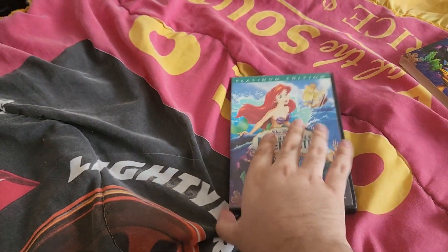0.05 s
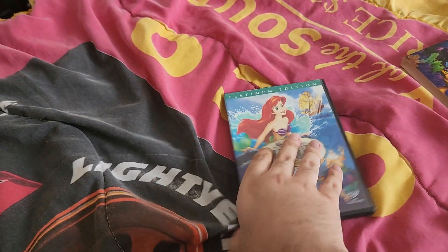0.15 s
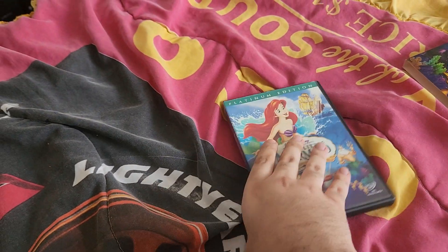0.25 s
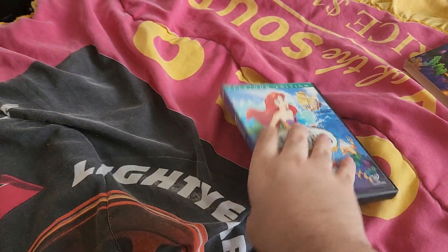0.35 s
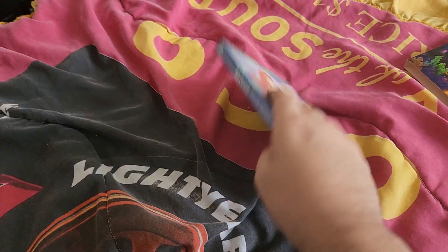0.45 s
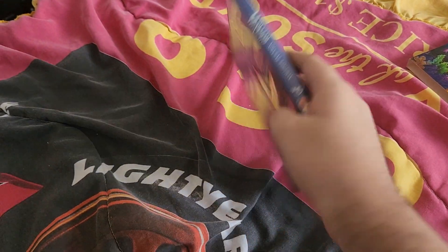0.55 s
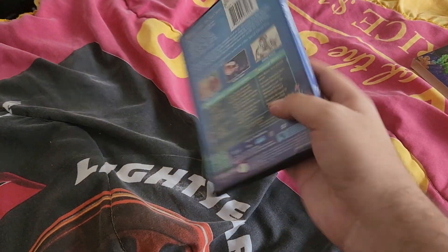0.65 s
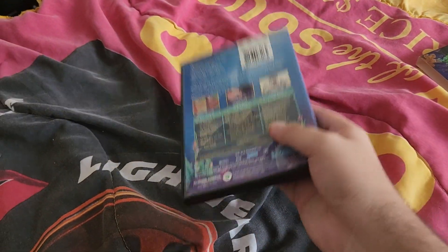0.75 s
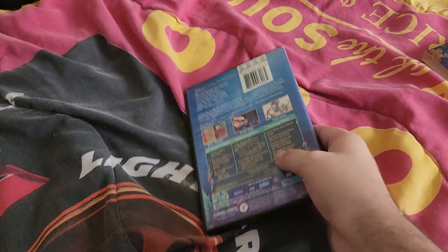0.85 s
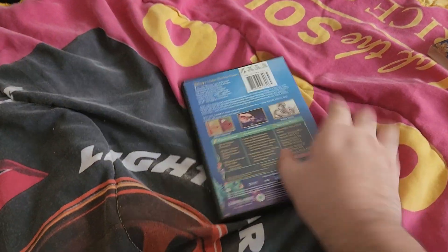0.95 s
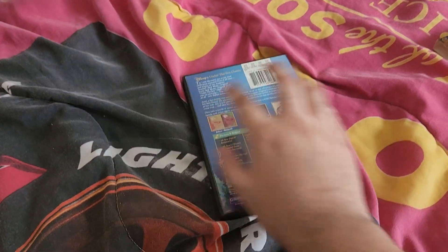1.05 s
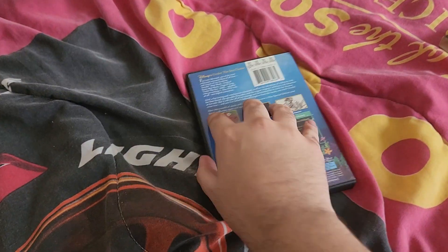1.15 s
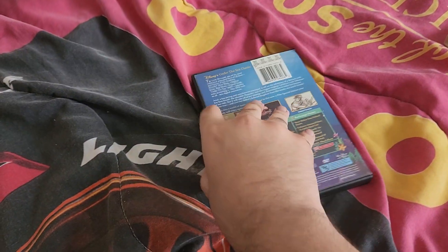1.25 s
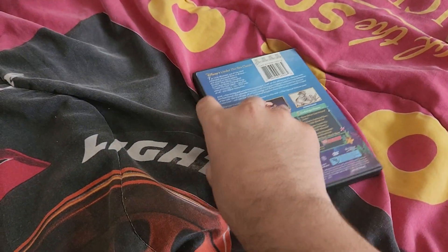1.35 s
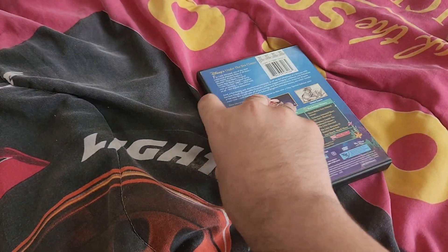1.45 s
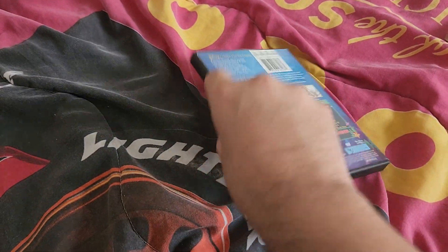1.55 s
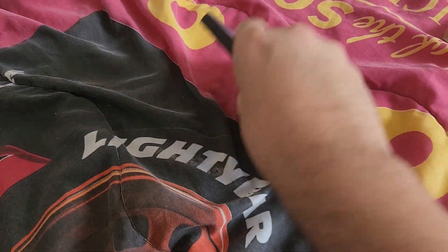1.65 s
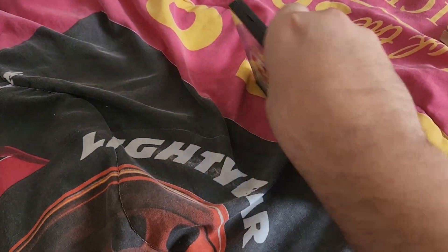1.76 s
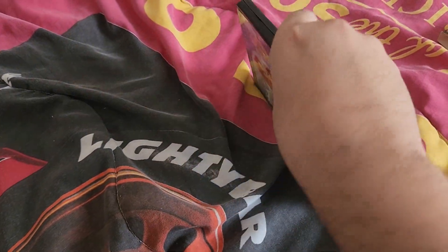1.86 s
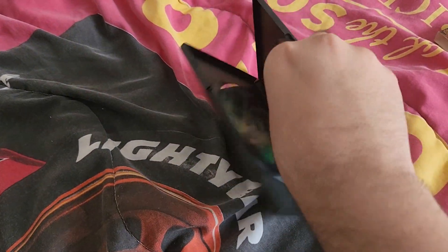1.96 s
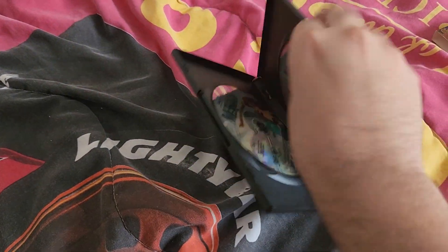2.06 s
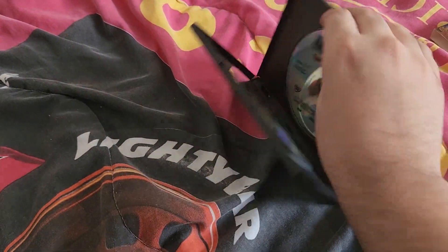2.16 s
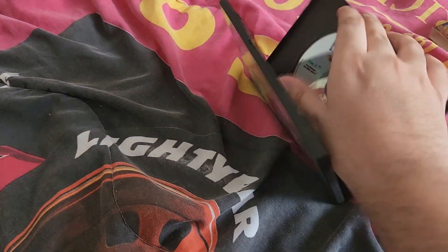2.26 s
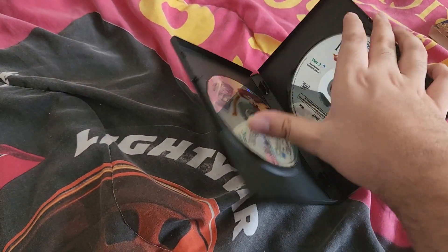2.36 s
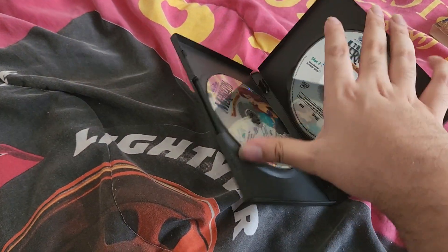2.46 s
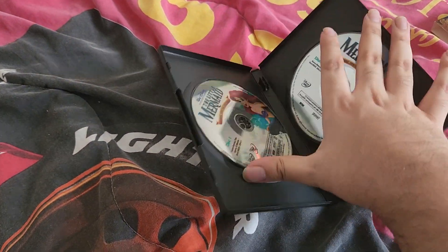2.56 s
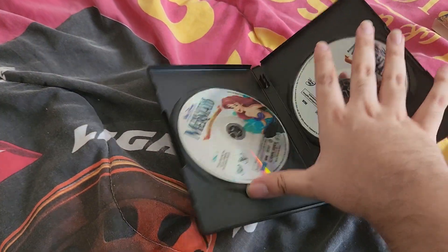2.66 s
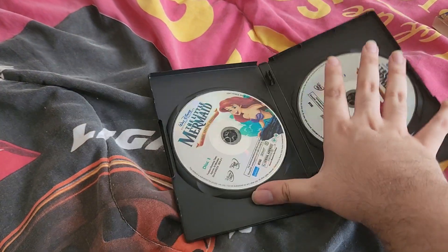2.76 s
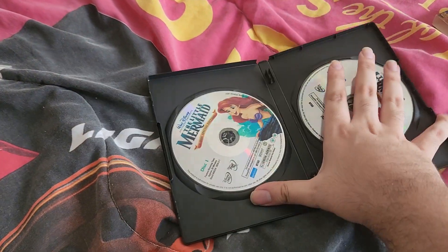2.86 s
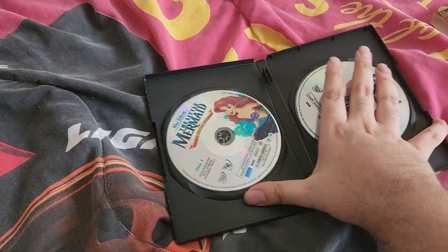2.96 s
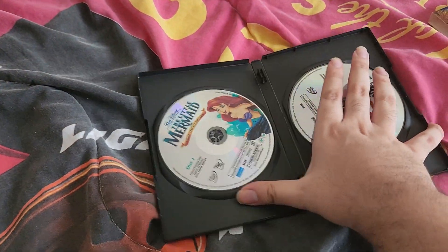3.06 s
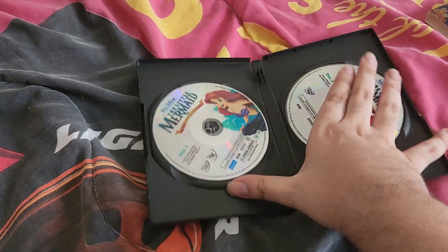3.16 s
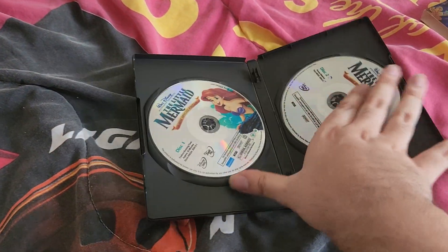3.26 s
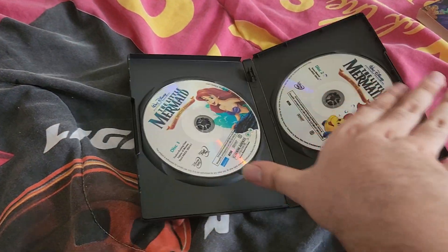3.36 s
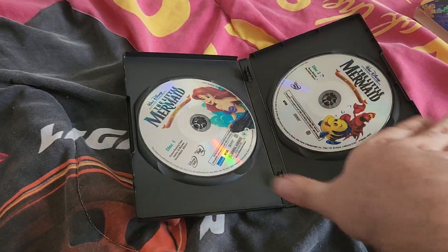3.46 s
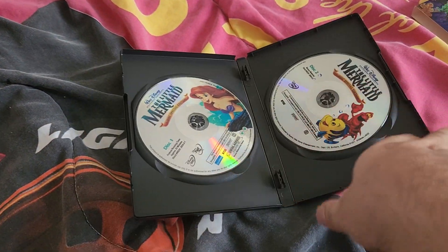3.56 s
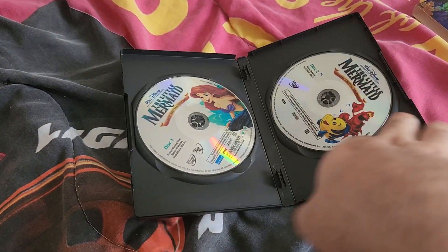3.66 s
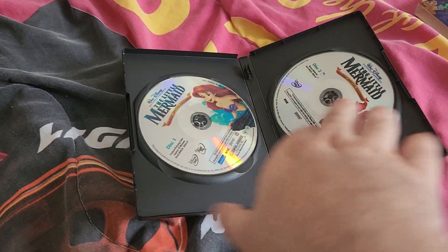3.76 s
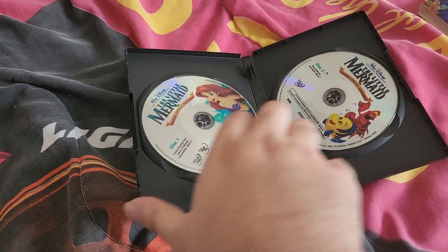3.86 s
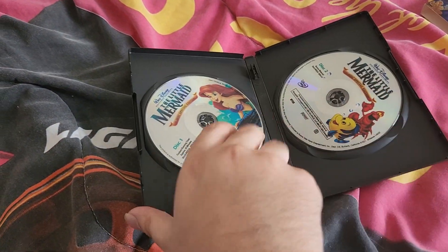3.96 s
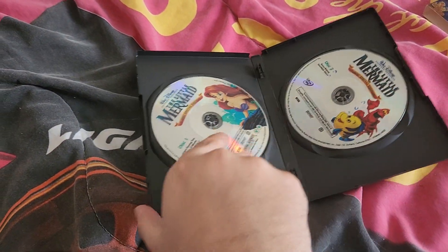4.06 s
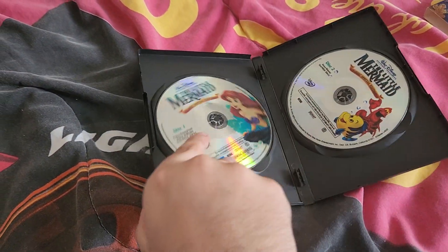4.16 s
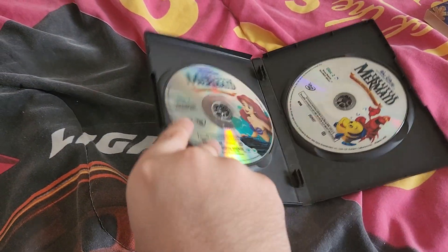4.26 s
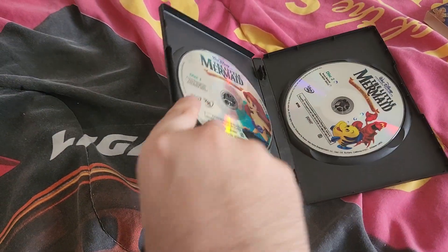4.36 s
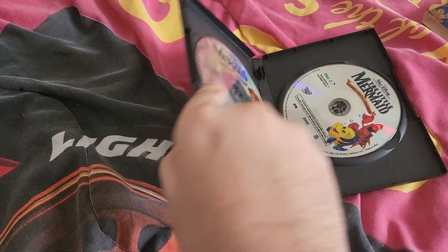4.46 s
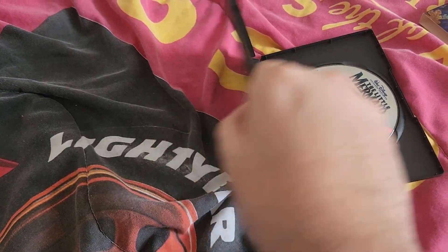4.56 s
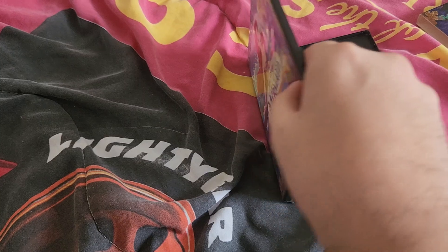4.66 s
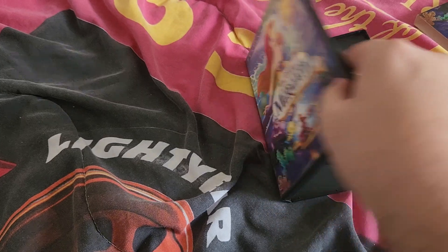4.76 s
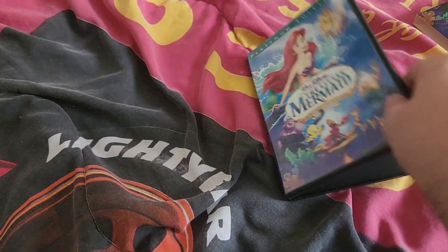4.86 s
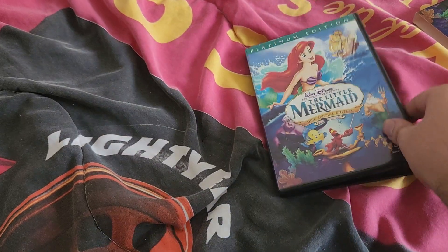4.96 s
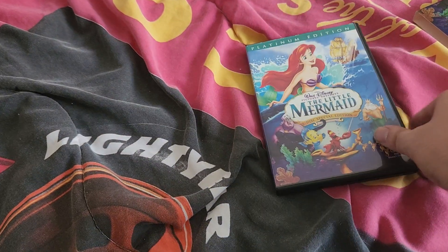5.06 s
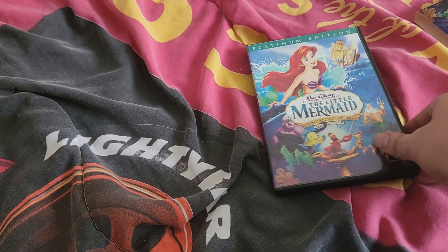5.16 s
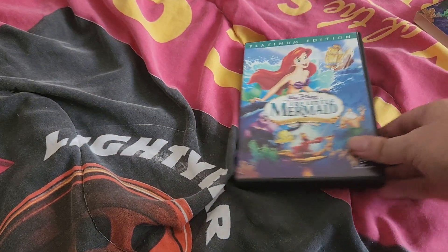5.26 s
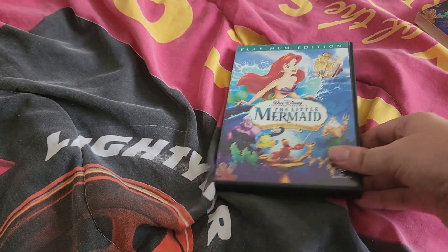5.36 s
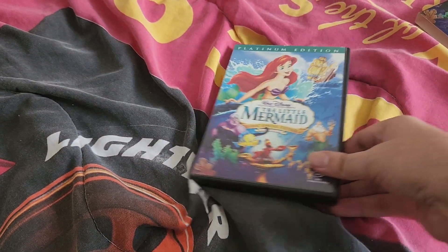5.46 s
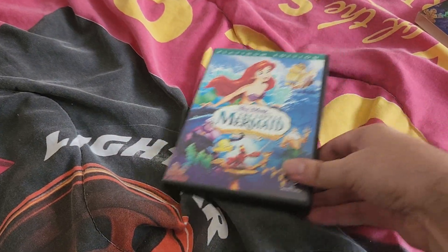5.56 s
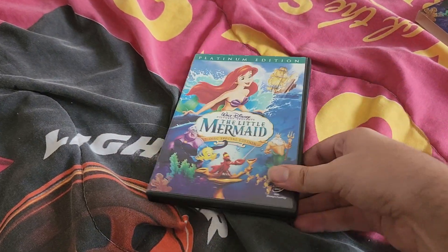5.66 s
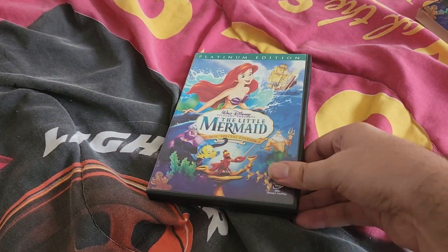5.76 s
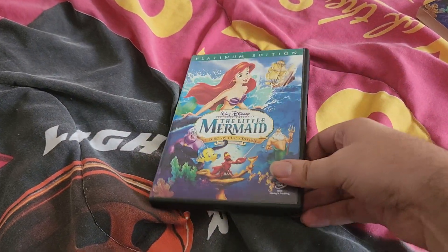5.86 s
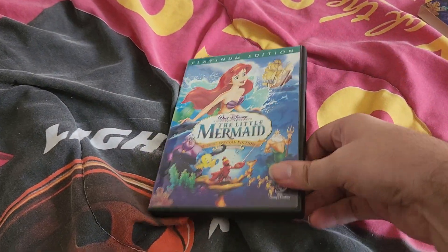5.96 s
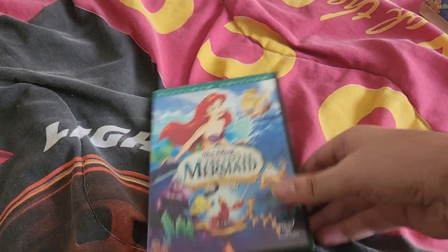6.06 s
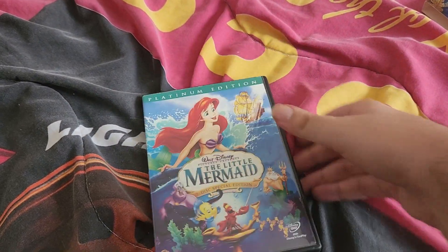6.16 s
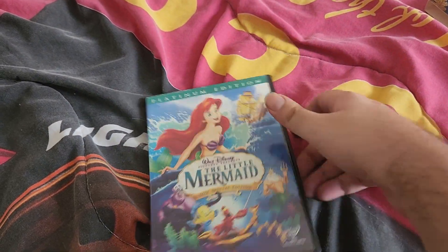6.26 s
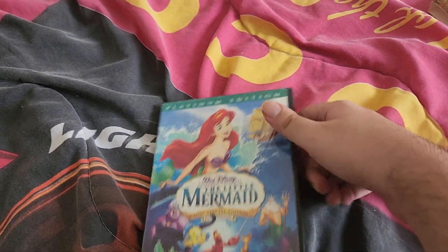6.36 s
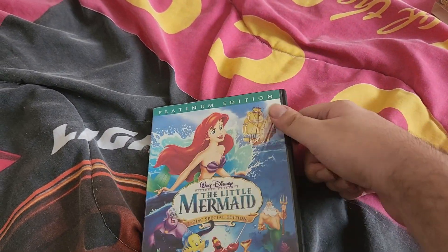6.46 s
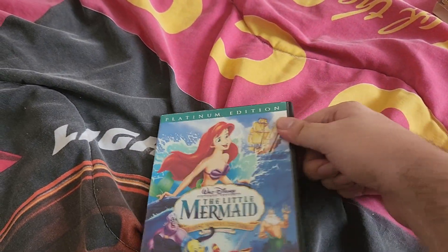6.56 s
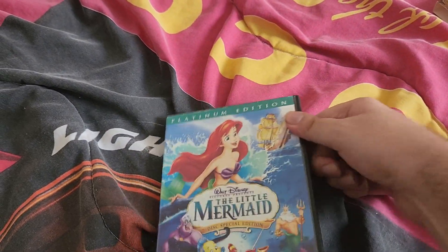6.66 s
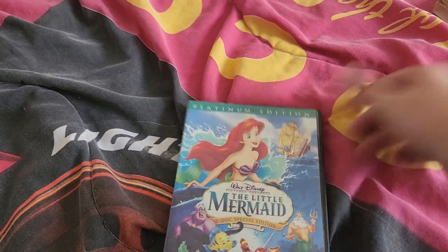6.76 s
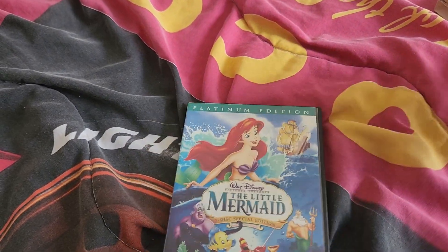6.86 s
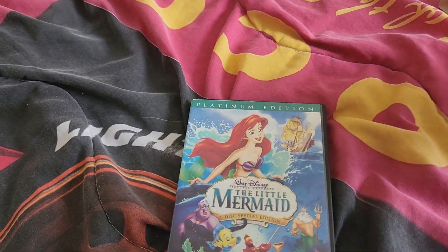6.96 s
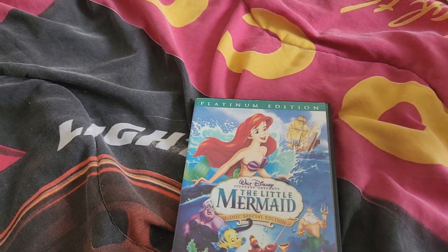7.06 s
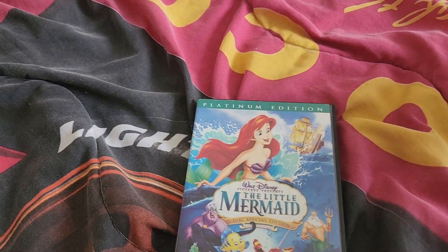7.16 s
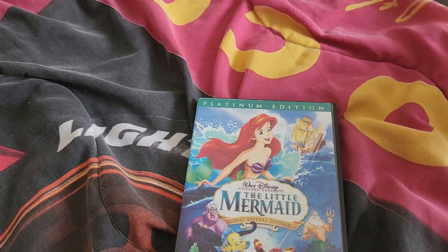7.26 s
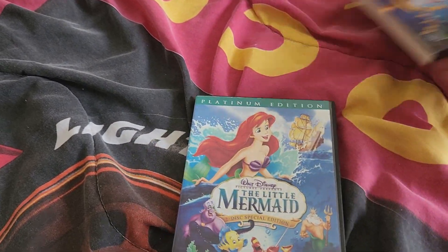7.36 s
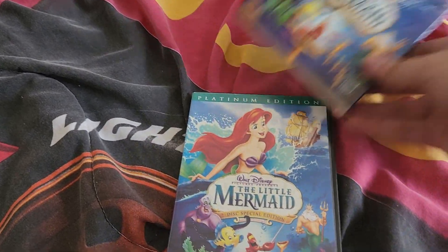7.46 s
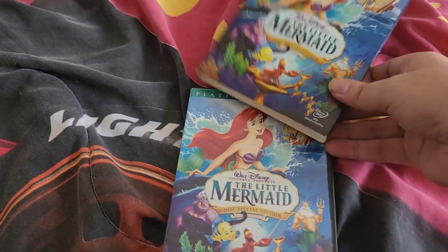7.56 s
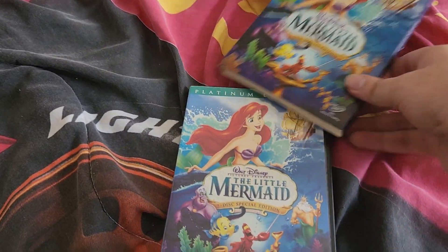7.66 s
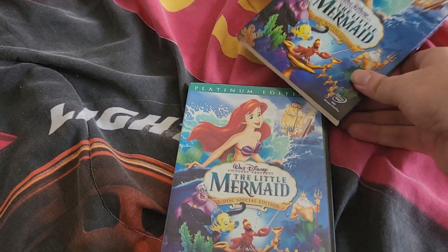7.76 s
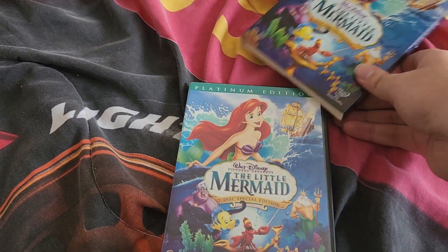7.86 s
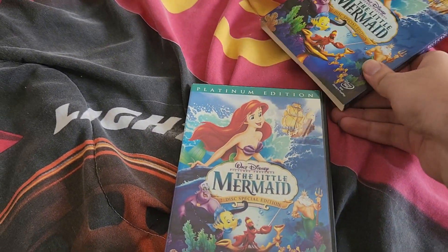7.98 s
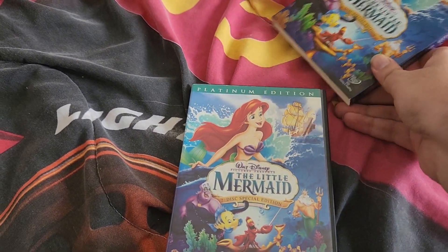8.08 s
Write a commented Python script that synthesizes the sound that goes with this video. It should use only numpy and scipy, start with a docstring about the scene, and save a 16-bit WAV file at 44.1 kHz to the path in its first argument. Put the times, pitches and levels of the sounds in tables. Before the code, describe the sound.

Hollow plastic handling, dry and near: small taps, a quick cluster of sharp clicks as the case lands, short squeaks and swishes, then the loudest crack as it is pried open. A quieter middle has faint disc ticks and grating. Closing brings scrapes, a firm snap, a soft bed thump and another strong snap, then rustle and gentle knocks. Stereo phone pickup, leaning left, with low rumble and thin hiss behind.

```python
"""Plastic clicks and snaps, close to a phone: a disc case is turned over on a duvet, prised open, folded shut,
snapped closed and laid down. Catches and edges are short noise bursts and sines that ring the thin shell's modes.
Fingers and cloth are grainy noise that rubs, and gliding overtones that squeak; the bed thumps as damped sines.
A small bedroom adds a short noise tail, and behind it lie a low rumble, a faint hum and a thin hiss."""
import sys
import numpy as np
from scipy import signal
from scipy.fft import rfft, irfft
from scipy.io import wavfile
from scipy.ndimage import uniform_filter1d

SR = 44100
rng = np.random.default_rng(int(sys.argv[2]) if len(sys.argv) > 2 else 0)


def output_pcm(signal):
    """Save a mono or channel-first signal as 16-bit PCM at the path in sys.argv[1].

    Samples are clipped to [-1, 1] before scaling.
    """
    pcm = np.clip(np.atleast_2d(signal).T, -1, 1) * 32767
    wavfile.write(sys.argv[1], SR, np.round(pcm).astype(np.int16))


N = 358091
TIME = np.arange(N) / SR
LEAD_S = .003  # a contact skids this long before it gives

# broad colour of the hollow body: (frequency [Hz], level [dB])
BODY_COLOUR = [(100, -8), (290, -0.5), (460, -7.5), (720, -1.5), (1500, -10), (3000, -46)]
# broad colour of the panels: (frequency [Hz], level [dB])
PANEL_COLOUR = [(600, -39), (1100, -6.5), (1550, -2), (2200, -4.5), (3400, -6), (6000, -17), (12000, -31.5)]
# broad colour of the surface: (frequency [Hz], level [dB])
SURFACE_COLOUR = [(1500, -19.5), (3500, -1.5), (5500, -5), (7800, -4.5), (9500, -9), (12500, -1.5),
                  (16000, -11)]


def clicks(low_db=-4, sharp_db=-12, scatter_db=4, tick_pan_db=4.0):
    """Snaps and knocks of handling, and random ticks of loose discs and the flexing hinge."""
    # catches, edges and fingernails: picked up from 0.07 s, dropped on its face at 0.9, prised open at 1.9,
    # spread flat at 2.3, folded shut by 4.1, first catch pressed home at 5.9, second at 6.5, another case
    # fetched from 7:
    # (time [s], level [dB], low body [dB], sharp crack [dB], ring of the struck spot [Hz])
    contacts = [(0.0739, -37.5, -11, -26, 1270), (0.5485, -50, -6.5, -19, 1680),
                (0.7162, -40, -7, -7.5, 1980), (0.838, -32, -13, -6.5, 2240), (0.8516, -30, -12, -4, 3800),
                (0.8779, -22, -23, 2, 2860), (0.8877, -27, -3, 1, 1750), (.9767, -28.5, -7, -3.5, 1540),
                (1.0122, -35.5, -7, 3.5, 1190), (1.1256, -29, 1, -3.5, 1340),
                (1.6484, -41, -3.5, -11.5, 1640), (1.8823, -19, -7, -18, 1970), (1.9, -9, -9, -21.5, 1630),
                (1.9166, -19.5, -15.5, -4.5, 1700), (1.983, -33.5, -20.5, -16, 1600),
                (2.1287, -41, -5, -1.5, 3170), (2.1787, -35, -16.5, -14, 1590),
                (2.2147, -39.5, -25, -6.5, 1570), (2.2479, -38.5, -8, 4.5, 3830),
                (2.2726, -27.5, -8, 1, 3660), (2.2786, -24.5, -14, 1, 2000), (2.2993, -33, -6.5, -2, 2250),
                (2.3597, -41.5, -2, -1.5, 2120), (2.4559, -35.5, -9, -3.5, 3050),
                (2.807, -50, -6, -21, 1620), (3.2173, -46, -3.5, -7, 2584), (3.6095, -43.5, -3, -7, 1673),
                (3.9978, -47.5, -2.5, -12, 1200), (4.1107, -40.5, -10, -6.5, 2920),
                (4.925, -49, -12, -28, 1710), (5.0136, -30, -10, -14, 1880),
                (5.1487, -44.5, -6.5, -13, 1630), (5.8353, -37, -12, -15.5, 1790),
                (5.8784, -27, -10, -5.5, 2210), (5.8824, -17, -12, -30, 2050),
                (5.8849, -19.5, -3.5, -12.5, 2360), (6.0525, -35, -17, -3.5, 1780),
                (6.0579, -45, -2, 7.5, 1780), (6.0668, -35.5, -15, -4, 2120), (6.1417, -34, -18, -12, 1570),
                (6.3275, -34, -14, -19, 1030), (6.5338, -24, -8.5, -21, 2200),
                (6.5484, -13, -4.5, -8, 2920), (6.7297, -50, 4, 13, 4750), (6.7877, -52.5, 3, -2.5, 3120),
                (7.0331, -39, -28, 0.5, 3175), (7.5122, -30.5, -10, -8.5, 1250),
                (8.035, -37, -5, -2.5, 1610)]
    # loose discs and hinge: (time [s], length [s], tick rate [1/s], level [dB])
    rattles = [(0.319, 0.059, 50, -56), (0.852, .16, 34, -41), (2.041, 0.19, 70, -46.5),
               (2.3, 0.091, 45, -42.5), (2.821, .12, 30, -61.5), (3.047, .12, 35, -59.5),
               (3.219, .12, 55, -56.5), (7.598, .13, 45, -49)]
    click_pan_db = 4  # left minus right
    snap_db, snap_pan_slope = -21.5, .9  # above this level a click moves to the right, in dB per dB
    out = np.zeros((2, N))
    for s, db, *tone in contacts:
        left_minus_right_db = click_pan_db - snap_pan_slope * max(db - snap_db, 0)
        add(out, s - LEAD_S, pan(left_minus_right_db) * click(db, *tone))
    for s, length, rate, db in rattles:
        count = max(int(length * rate), 1)
        for k, (when, size, place) in enumerate(rng.random((count, 3))):
            tick_db = db + scatter_db * (2 * size - 1)
            tick = click(tick_db, low_db, sharp_db, hz=1200 + 2000 * place)
            add(out, s + length * (k + when) / count, pan(tick_pan_db) * tick)
    return out


def click(db, low_db, sharp_db, hz, spot_s=.0012, spot_share=1.0, panel_db=-1.0, body_db=0.0, crack_db=1):
    """A click rings the struck spot for a few cycles, the panels and body around it, and cracks on the surface."""
    t = np.arange(4096) / SR - LEAD_S
    after = np.maximum(t, 0)
    flex = 1 + 0.019 * rng.standard_normal()  # every grip bends the shell differently
    linger = 2 + np.clip((-29.5 - db) / 8, 0, 2)  # gentle contacts last longer than hard snaps

    spot_decay = np.exp(-after / spot_s)
    spot = np.sin(2 * np.pi * hz * t) * spot_decay * (1 - spot_decay)

    panel_blow = blow(t, .0013 * linger, ring_db=-20.0, ring_s=0.023, apart=0.54)
    panel = attack(colour(panel_blow, shell(PANEL_COLOUR, between_db=-4, flex=flex)))
    panel = attack(panel + spot_share * attack(spot[None]))

    body_blow = blow(t, 0.00088 * linger, ring_db=-19.5, ring_s=.013, apart=0.47)
    body = attack(colour(body_blow, shell(BODY_COLOUR, flex=flex)))

    crack_blow = blow(t, 0.00051 * linger, ring_db=-21.0, ring_s=0.019, apart=1.0, rise_s=0.0004)
    crack = attack(colour(crack_blow, shell(SURFACE_COLOUR, flex=flex)))

    mix = undb(panel_db) * panel
    mix = mix + undb(low_db + body_db) * body
    mix = mix + undb(sharp_db + crack_db) * crack
    return undb(db) * mix


def blow(t, fall_s, ring_db, ring_s, apart, rise_s=.0007):
    """Contact chatter that builds up to time 0 and dies fast, with a weaker, longer rattle behind it."""
    after = np.maximum(t, 0)
    build = np.exp(np.minimum(t, 0) / rise_s)
    decay = np.exp(-after / fall_s) + undb(ring_db) * np.exp(-after / ring_s)
    return pair(len(t), apart) * build * decay


def attack(x):
    """Scale so that the start holds the energy of 4 ms at rms 1."""
    span, held = int((LEAD_S + .0035) * SR), .004 * SR
    energy = np.mean(np.sum(x[:, :span] ** 2, axis=1))
    return x / np.sqrt(energy / held)


def shell(points, between_db=-6, flex=1):
    """A part of the case: its broad colour with the shell's modes standing out of it; flex retunes the modes."""
    # modes of the plastic shell: (frequency [Hz], width [Hz], level [dB])
    modes = [(674, 75, -5.5), (980, 150, -1), (1490, 60, -2), (1636, 87, 2.5), (1850, 89, -3),
             (2090, 160, -1), (2570, 62, -3), (3190, 67, -2.5), (4500, 150, -3), (5605, 88, 4.5)]

    def gain(hz):
        resonance = sum(undb(db) ** 2 / (1 + (2 * (hz - f * flex) / width) ** 2) for f, width, db in modes)
        return curve(points, hz) * np.sqrt(resonance + undb(between_db) ** 2)
    return gain


def scrapes(panel_db=-2, body_db=-2, hiss_db=0.5, pan_db=3):
    """Hard plastic slips coarsely and mostly rings the panels."""
    # plastic grating on plastic, discs shaking in their trays:
    # (peak time [s], rise [s], fall [s], level [dB], low body [dB], hiss [dB])
    gratings = [(0.079, 0.023, 0.1, -52, 3.5, -14), (0.664, 0.024, 0.04, -44.5, 3, -7),
                (0.887, 0.049, 0.039, -32.5, 3.5, -3.5), (1.016, 0.094, 0.039, -33.5, -1.5, -9),
                (1.72, 0.075, 0.2, -55.5, -1, -8), (1.856, 0.0085, 0.022, -34, 2, -12),
                (1.917, 0.046, 0.087, -29, -6, -4.5), (2.29, 0.35, 0.12, -46.5, 1, -4),
                (2.467, 0.011, 0.065, -35.5, -2, -8), (2.524, 0.056, 0.038, -36.5, -1.5, -15),
                (2.66, 0.16, .14, -54.5, -1.5, 1), (3.22, 0.15, 0.14, -66, 0, -0.5),
                (3.619, 0.018, 0.05, -47.5, -6, -19), (4.122, 0.03, 0.11, -36, -7, -12.5),
                (4.162, 0.046, 0.036, -33.5, -13, -11.5), (4.223, 0.049, .11, -35.5, -4.5, -10.5),
                (4.982, 0.019, 0.089, -32, -7.5, -16.5), (5.073, .015, 0.013, -43, -3.5, -31),
                (6.148, 0.051, 0.032, -35, -2.5, -13), (6.304, .08, 0.23, -56.5, -2, -3.5),
                (6.565, 0.044, 0.084, -39, -0.5, -6.5), (7.524, 0.025, 0.04, -44, 0, -4.5),
                (7.62, .025, 0.13, -42.5, -2, -8), (7.717, 0.045, .055, -49, -8, -27),
                (7.903, 0.075, 0.07, -48, -9, -6), (8.04, 0.024, 0.078, -49.5, -2, -1.5)]
    strokes = [(s, rise, fall, db + panel_db, db + low + body_db, db + hiss + hiss_db)
               for s, rise, fall, db, low, hiss in gratings]
    grain = slipping(slips_per_s=300, scatter_db=7.0, slip_s=0.0083, smooth=.7)
    smoother_grain = unit(np.hypot(grain, 1.2))
    return pan(pan_db) * rubbing(strokes, grain, smoother_grain)


def slides(panel_db=-10, body_db=-2, hiss_db=-2.0, pan_db=3):
    """Cloth slips finely and mostly hisses."""
    # cloth and skin over the sleeve: (peak time [s], rise [s], fall [s], level [dB], low body [dB])
    cloth_strokes = [(.13, 0.11, 0.18, -52, -3), (.46, 0.1, 0.087, -55, -5), (1.19, 0.3, 0.46, -54.5, 0.5),
                     (1.544, 0.28, .14, -46.5, -9.5), (3.0, 0.11, 0.67, -59.5, -9),
                     (3.35, 0.18, 0.27, -60, -15.5), (4.82, 0.13, 0.3, -62, -20),
                     (5.289, 0.28, 0.32, -58.5, -12), (5.625, 0.12, 0.046, -47.5, -16.5),
                     (6.04, 0.22, .06, -48.5, -17), (6.901, .12, 0.19, -66.5, -22),
                     (7.061, 0.12, 0.078, -48.5, -30), (7.27, 0.051, 0.07, -40.5, -9.5),
                     (7.354, 0.15, 0.025, -29, -31)]
    strokes = [(s, rise, fall, db + panel_db, db + low + body_db, db + hiss_db)
               for s, rise, fall, db, low in cloth_strokes]
    grain = slipping(slips_per_s=400, scatter_db=8.0, slip_s=0.0042, smooth=1.6)
    return pan(pan_db) * rubbing(strokes, grain, grain)


def rubbing(strokes, grain, hiss_grain):
    """Friction excites panels, body and surface; each stroke gives its timing and the dB of those three."""
    power = np.zeros((3, N))
    for peak_s, rise_s, fall_s, *parts_db in strokes:
        power += undb(parts_db)[:, None] ** 2 * stroke(peak_s, rise_s, fall_s)
    panel = unit(colour(grain * pair(N, 0.46), shell(PANEL_COLOUR, between_db=-2.5)))
    body = unit(colour(grain * pair(N, .25), shell(BODY_COLOUR)))
    hiss = unit(colour(hiss_grain * pair(N, 1.0), shell(SURFACE_COLOUR, between_db=6)))
    return sum(gain * part for gain, part in zip(np.sqrt(power), (panel, body, hiss)))


def stroke(peak_s, rise_s, fall_s, fade_db=20.5, fade_curve=1.2):
    """Friction power of one hand stroke: fade_db down one rise time before its peak and one fall time after."""
    away = np.maximum((peak_s - TIME) / rise_s, (TIME - peak_s) / fall_s)
    near, power = away < 3, np.zeros(N)
    power[near] = undb(-fade_db * away[near] ** fade_curve) ** 2
    return power


def slipping(slips_per_s, scatter_db, slip_s, smooth):
    """Grain of friction: countless tiny slips of uneven size over an even part."""
    sizes = undb(scatter_db * np.minimum(rng.exponential(size=N), 4))
    slips = (rng.random(N) < slips_per_s / SR) * sizes ** 2
    power = signal.lfilter([1], [1, -np.exp(-1 / (slip_s * SR))], slips)  # each slip dies exponentially
    return unit(np.sqrt(power / power.mean() + abs(smooth)))


def swishes(width=0.26, skew=1.12, pan_db=4):
    """Fine, irregular slipping at a nearly steady rate: a narrow band that builds and lets go."""
    # light strokes over the sleeves: (time [s], length [s], centre [Hz], level [dB])
    light_strokes = [(1.452, .035, 1400, -40), (2.487, 0.074, 2000, -42.5), (2.594, 0.069, 1240, -57),
                     (5.162, 0.27, 1700, -59.5), (5.447, 0.26, 1726, -48.5), (5.78, 0.13, 1860, -50.5),
                     (7.022, .095, 2520, -50.5), (7.664, 0.1, 1650, -54.5), (7.854, 0.088, 1724, -51)]
    out = np.zeros((2, N))
    slips = pair(N, .8) * slipping(slips_per_s=230, scatter_db=2.5, slip_s=0.0023, smooth=0.47)
    for s, length, hz, db in light_strokes:
        u = np.linspace(0, 1, int(length * SR))
        piece = slips[:, int(s * SR):][:, :len(u)]
        band = unit(colour(piece, lambda f: 1 / (1 + (2 * np.log(f / hz) / width) ** 4) ** .5))
        add(out, s, undb(db) * pan(pan_db) * band * np.sin(np.pi * u ** skew))
    return out


def squeaks(flutter=0.21, pan_db=1):
    """Stick and slip: a gliding, unsteady stack of overtones that swells and dies."""
    # fingertips on the sleeve: (time [s], length [s], start [Hz], end [Hz], level [dB],
    # fall of the overtones [dB per octave], unsteadiness [share of the pitch])
    finger_slips = [(0.4, 0.11, 754, 817, -51, 16, 0.097), (0.645, 0.032, 395, 348, -39.5, 5, 0.051),
                    (1.267, 0.04, 1774, 1340, -41, -5, 0.078), (1.327, 0.03, 1727, 1072, -40.5, 0, 0.12),
                    (1.386, 0.027, 1700, 2820, -43, -7, 0.081), (1.425, .016, 2400, 1750, -49, -8.5, .04),
                    (1.502, 0.055, 966, 707, -41, -4.5, 0.064), (4.104, 0.035, 633, 905, -40.5, 12, 0.051)]
    out = np.zeros((2, N))
    k = np.arange(1, 21)[:, None]  # overtone numbers
    for s, length, start_hz, end_hz, db, fall_db, waver in finger_slips:
        u = np.linspace(0, 1, int(length * SR))
        wander = unit(uniform_filter1d(rng.standard_normal((2, N // 8)), size=110))
        drift, grip = wander[:, :len(u)]
        hz = (start_hz + (end_hz - start_hz) * u) * (1 + waver * drift)
        weight = undb(-fall_db * np.log2(k)) / (1 + (k * hz / 9000) ** 4)
        weight = weight * (k * hz < SR / 2)
        phase = k * 2 * np.pi * np.cumsum(hz) / SR + 2 * np.pi * rng.random(k.shape)
        tone = np.sum(weight * np.sin(phase), axis=0)
        add(out, s, undb(db) * pan(pan_db) * unit(tone * np.exp(flutter * grip)) * np.sin(np.pi * u))
    return out


def beamed(x, edge_hz=9000):
    """The top treble rises and falls as the case turns."""
    # how squarely the case faces the phone, as gain of the top treble: (time [s], level [dB])
    facing = [(.25, 4.5), (.75, -22.5), (1.1, -1), (4, -6), (5.7, 0), (6.05, 3), (6.5, 4), (7.6, -3.5)]
    top = signal.sosfiltfilt(signal.butter(3, edge_hz, "high", fs=SR, output="sos"), x)
    top_gain = undb(np.interp(TIME, *np.transpose(facing)))
    return x + (top_gain - 1) * top


def hand_echo(x, lag_s=.0016, travel=.3, share=0.39):
    """The hand and lid reflect each sound; their changing distance moves peaks and notches through its colour."""
    moments = np.linspace(0, TIME[-1], num=17)
    distance = np.interp(TIME, moments, rng.standard_normal(len(moments)))
    lag = lag_s * np.exp(travel * distance)
    echo = np.array([np.interp(TIME - lag, TIME, side) for side in x])
    return (x + share * echo) / np.hypot(1, share)


def thumps(rise_s=0.0017, fall_s=0.013):
    """The mattress gives way and swings briefly: a damped sine."""
    # the case and hand landing on the duvet: (time [s], level [dB], frequency [Hz])
    landings = [(.078, -38, 45), (0.985, -33, 44.5), (1.13, -35.5, 91), (1.89, -30, 81),
                (2.581, -35.5, 58.3), (6.076, -26.5, 64), (6.549, -39.5, 113), (7.602, -41, 111.3),
                (7.798, -48, 69.8)]
    out, t = np.zeros((2, N)), np.arange(8192) / SR
    swell = (1 - np.exp(-t / rise_s)) * np.exp(-t / fall_s)
    for s, db, hz in landings:
        swing = np.sin(2 * np.pi * hz * t) * swell / swell.max()
        add(out, s, undb(db) * swing[None])
    return out


def bedroom(x, wet_db=-7, t60_low=0.22, t60_high=0.24, treble_db=-4, gap_s=0.0065):
    """Near walls answer within milliseconds with a dense, dying tail, weaker in the treble."""
    t = np.arange(16384) / SR
    low_noise = pair(len(t), 0.78) * np.clip(t / gap_s - .5, 0, 1)
    high_noise = pair(len(t), 1.0) * (t > gap_s)
    low = signal.sosfilt(signal.butter(2, 6000, fs=SR, output="sos"), low_noise)
    high = signal.sosfilt(signal.butter(2, 6000, "high", fs=SR, output="sos"), high_noise)
    tail = low * undb(-60 * t / t60_low) + undb(treble_db) * high * undb(-60 * t / t60_high)
    tail *= undb(wet_db) / np.sqrt(SR * t60_low / np.log(1e6))  # offset the energy of the long decay
    return x + signal.fftconvolve(x, tail, axes=1)[:, :N]


def air(air_db=-56.5, hum_hz=83.0, hum_db=-65):
    """Low house rumble, alike on both sides, a faint hum and a thin hiss."""
    # quiet bedroom: (frequency [Hz], level [dB per Hz])
    room_tone = [(20, -2.5), (55, 0.5), (120, -2), (175, -17.5), (400, -23), (2000, -32), (7500, -37),
                 (9000, -43.5), (16000, -39)]
    rumble = colour(pair(N, 0.05), lambda hz: curve(room_tone, hz) / (1 + hz / 900))
    hiss = colour(pair(N, 0.98), lambda hz: curve(room_tone, hz) * hz / (900 + hz))
    hum = unit(np.sin(2 * np.pi * hum_hz * TIME))
    return undb(air_db) * unit(rumble + hiss) + undb(hum_db) * hum


def undb(db):
    """Decibels to gain."""
    return 10 ** (np.asarray(db) / 20)


def unit(x):
    """Scale to rms 1."""
    return x / np.sqrt(np.mean(x ** 2))


def freqs(size):
    """Frequencies of a spectrum's bins, kept above zero."""
    return np.maximum(np.fft.rfftfreq(size, 1 / SR), 1)


def curve(points, hz):
    """Gain of a (Hz, dB) line, straight over log frequency."""
    f, db = np.transpose(points)
    return undb(np.interp(np.log(hz), np.log(f), db))


def colour(x, gain):
    """Filter by gain(Hz) with minimum phase, so that no sound comes ahead of its cause."""
    size = 4096
    cepstrum = irfft(np.log(gain(freqs(size)) + 1e-6))
    cepstrum[1:size // 2] *= 2  # fold the later half onto the earlier
    cepstrum[size // 2 + 1:] = 0
    response = irfft(np.exp(rfft(cepstrum)))
    return signal.fftconvolve(x, response[None], axes=1)[:, :x.shape[1]]


def pair(size, apart):
    """Left and right noise; apart 0 is the same in both, 1 unrelated."""
    mid, side = rng.standard_normal((2, size))
    return unit(np.array([mid + apart * side, mid - apart * side]))


def pan(db):
    """Left and right gains for a level difference, left minus right."""
    return undb(np.array([[.5], [-.5]]) * db)


def add(out, s, x):
    """Mix a sound in at time s."""
    i = int(s * SR)
    out[:, i:i + x.shape[1]] += x[:, :N - i]


def scene():
    """The handled case in the room, the bed under it and the quiet air."""
    handling = clicks() + scrapes() + slides() + swishes() + squeaks()
    return bedroom(hand_echo(beamed(handling))) + thumps() + air()


def record(dry):
    """Each microphone port colours the sound, the sharpest snaps are rounded, and the top is cut at 16 kHz."""
    # the two ports hear different colours: (frequency [Hz], left minus right [dB])
    ports = [(250, 1.5), (1000, 3.5), (2000, 7), (4000, 6.5), (8000, 12.5), (12000, 2)]
    left = colour(dry[:1], lambda hz: curve(ports, hz) ** .5)  # each side takes half the difference
    right = colour(dry[1:], lambda hz: curve(ports, hz) ** -.5)
    rounded = np.tanh(np.vstack([left, right]))
    return signal.sosfilt(signal.ellip(10, .2, 80, 16000, fs=SR, output="sos"), rounded)


dry = scene()
out = record(dry)
output_pcm(out)
```